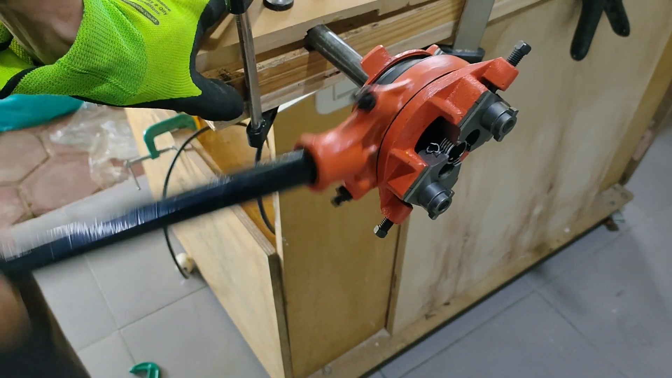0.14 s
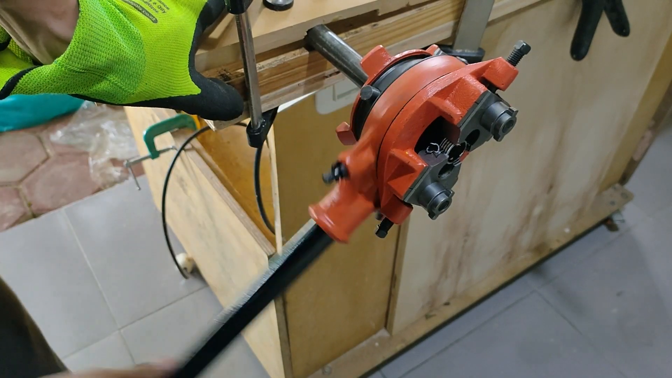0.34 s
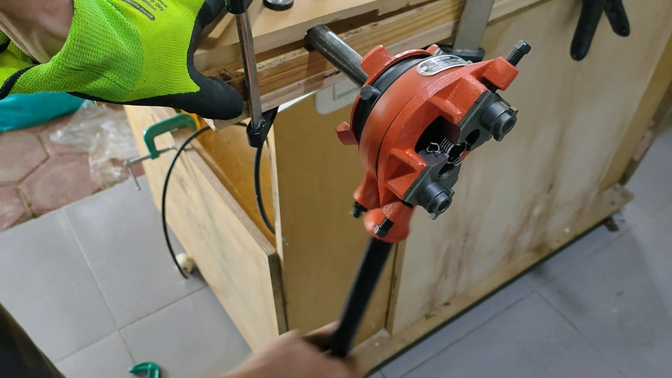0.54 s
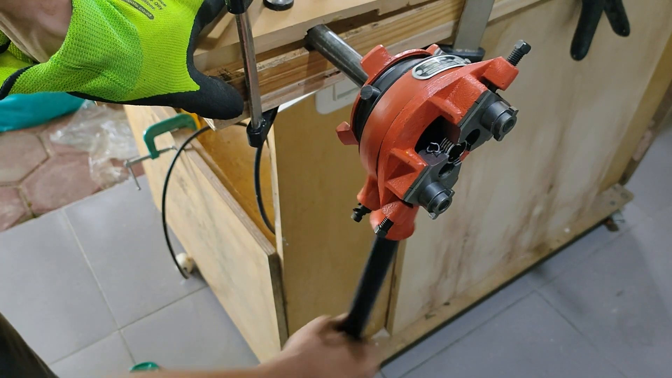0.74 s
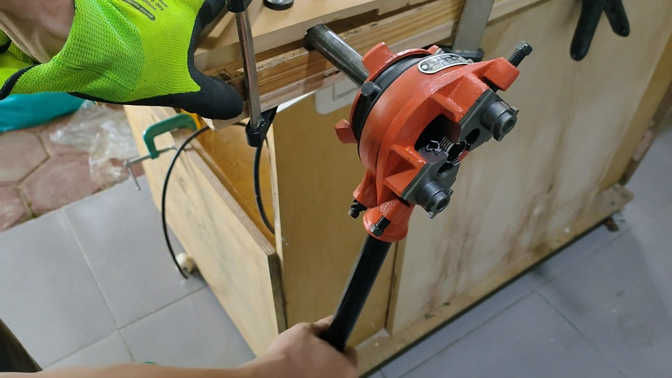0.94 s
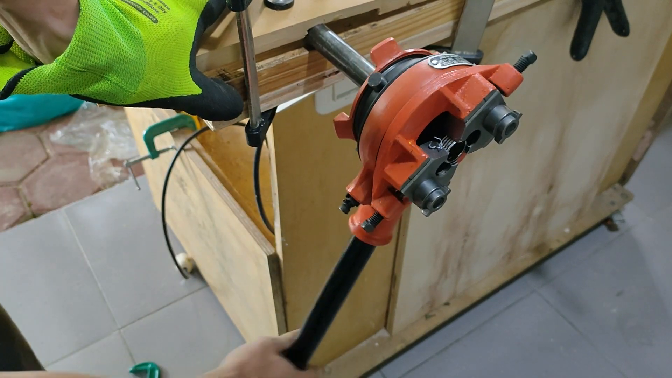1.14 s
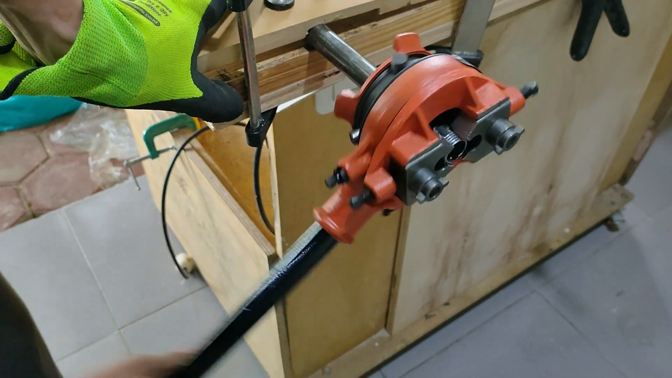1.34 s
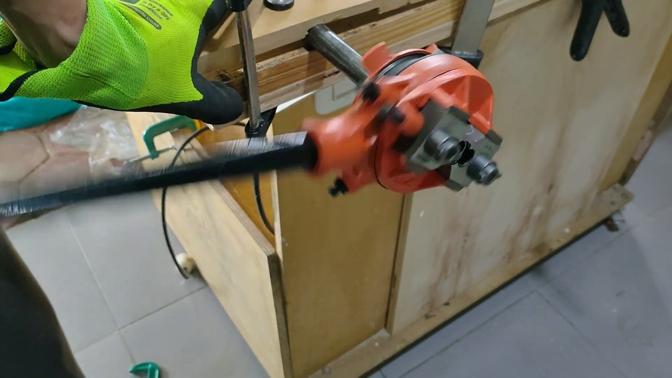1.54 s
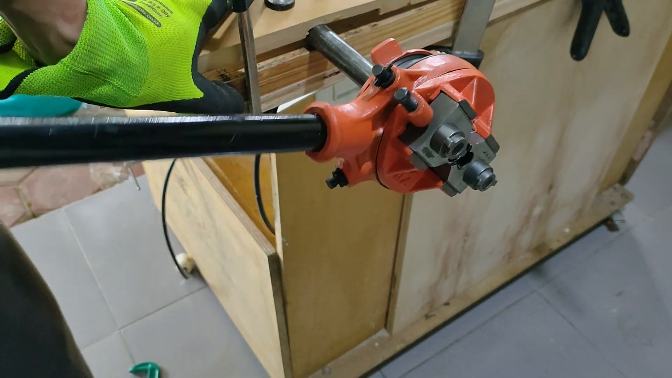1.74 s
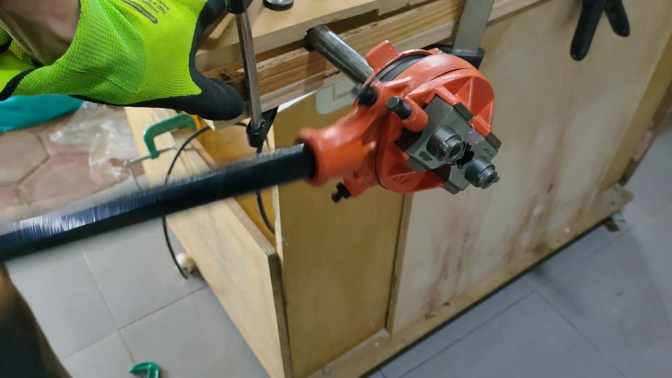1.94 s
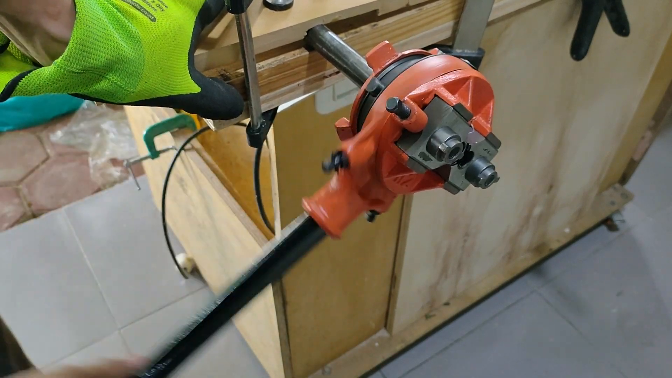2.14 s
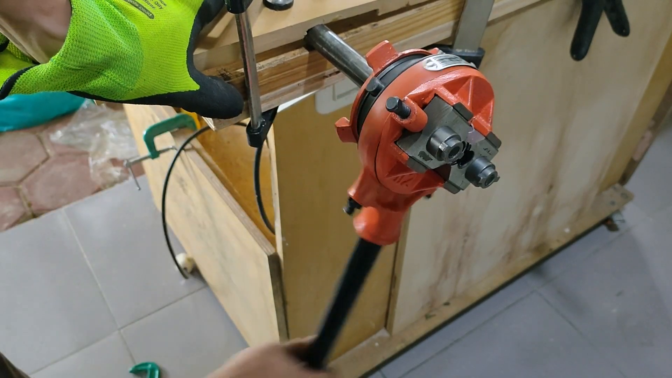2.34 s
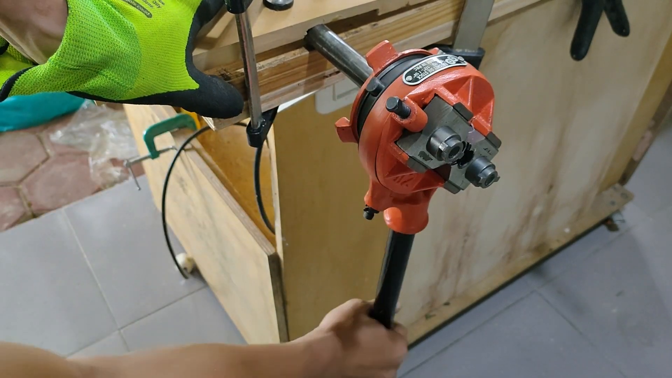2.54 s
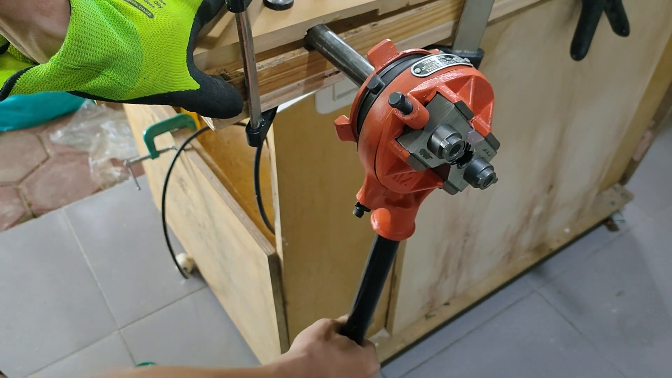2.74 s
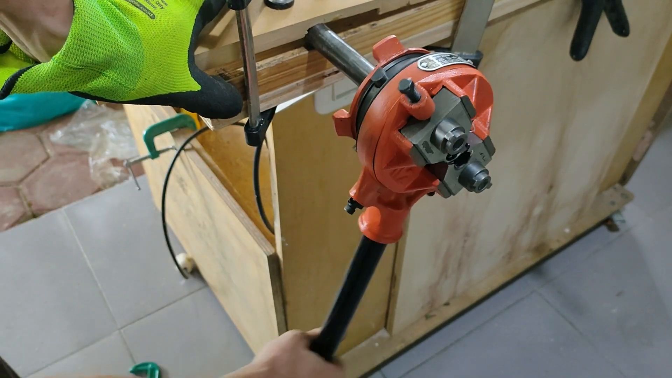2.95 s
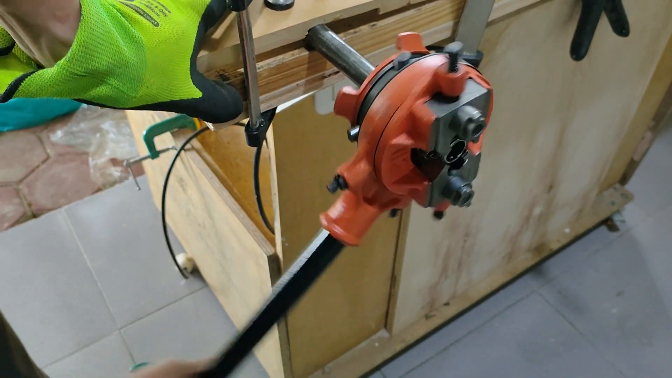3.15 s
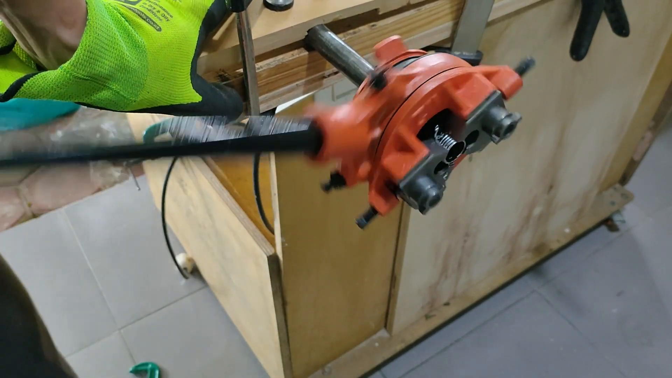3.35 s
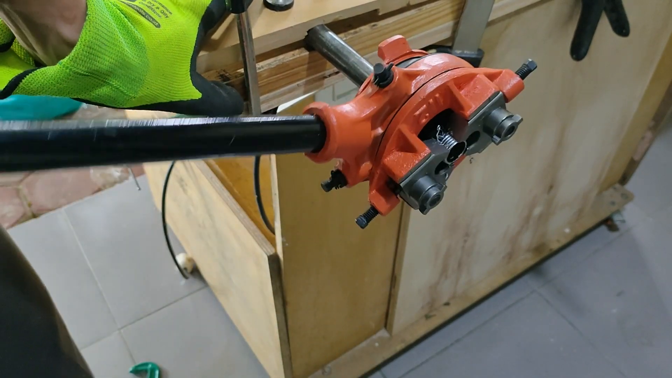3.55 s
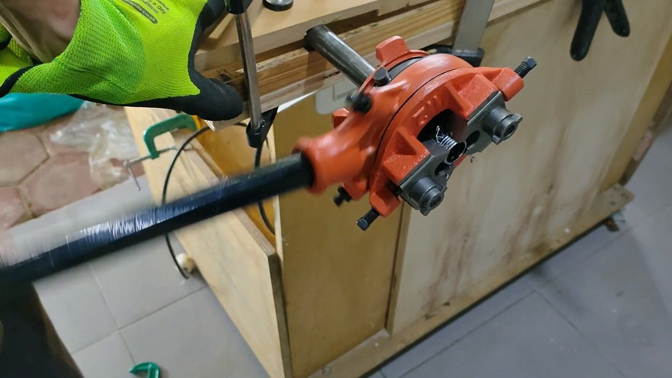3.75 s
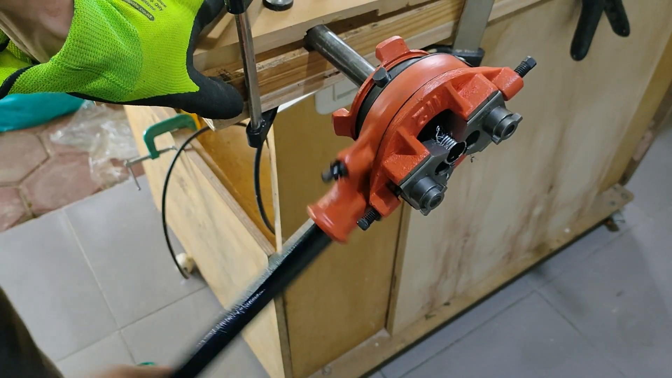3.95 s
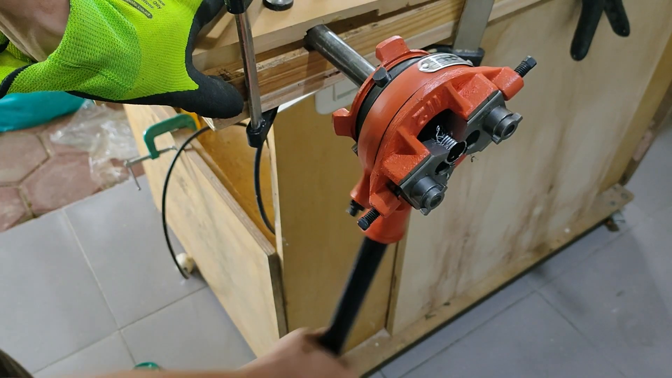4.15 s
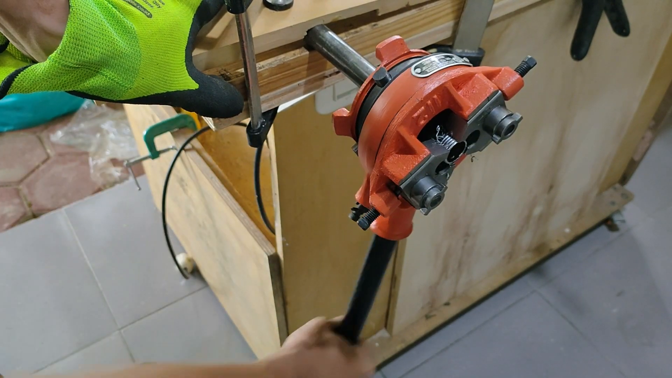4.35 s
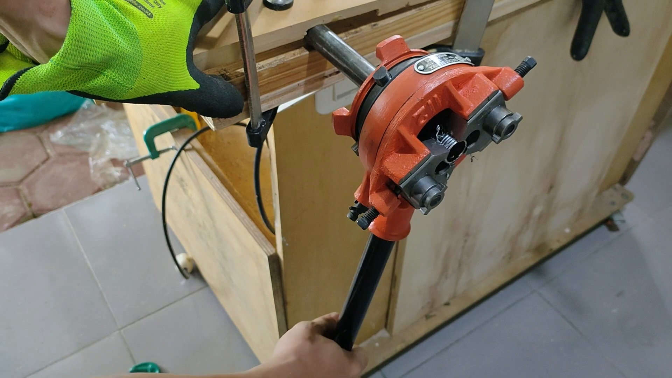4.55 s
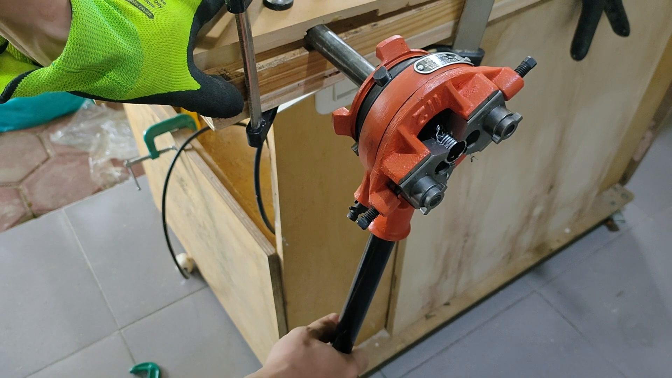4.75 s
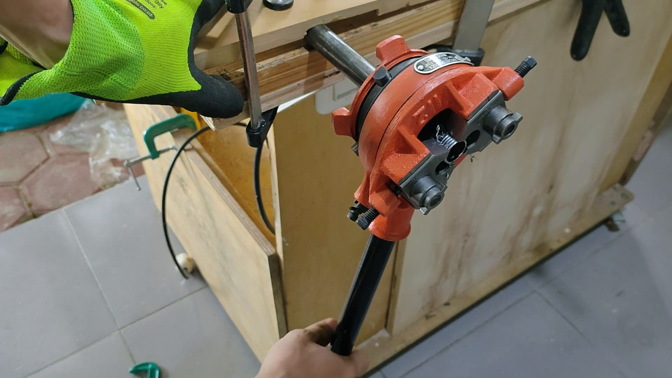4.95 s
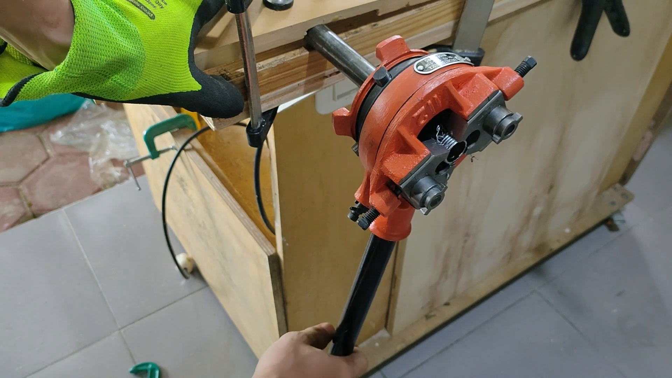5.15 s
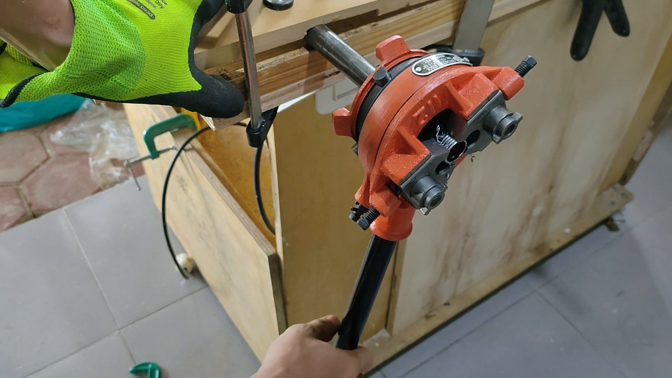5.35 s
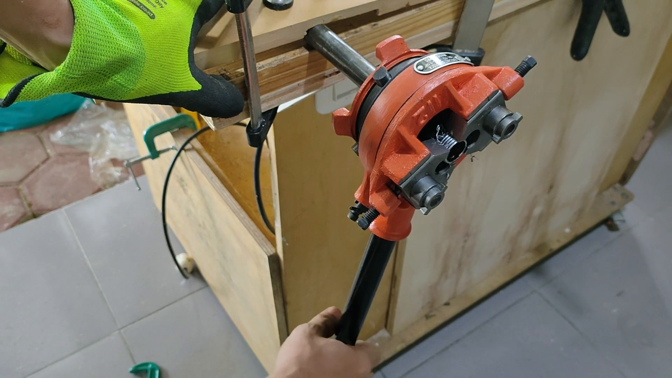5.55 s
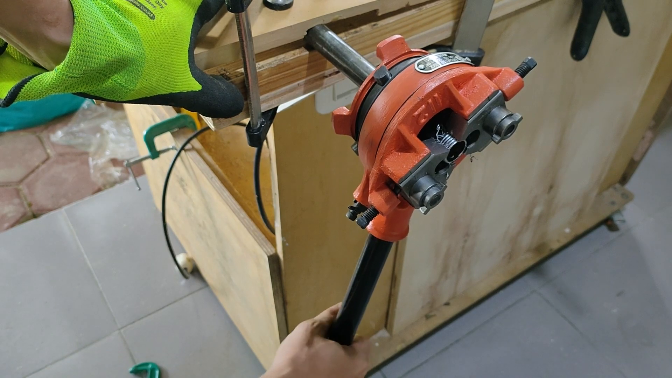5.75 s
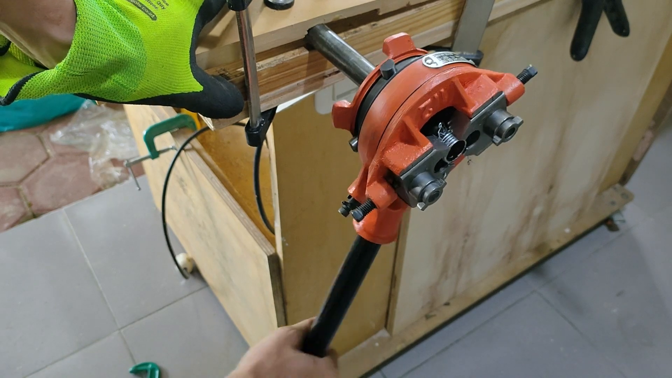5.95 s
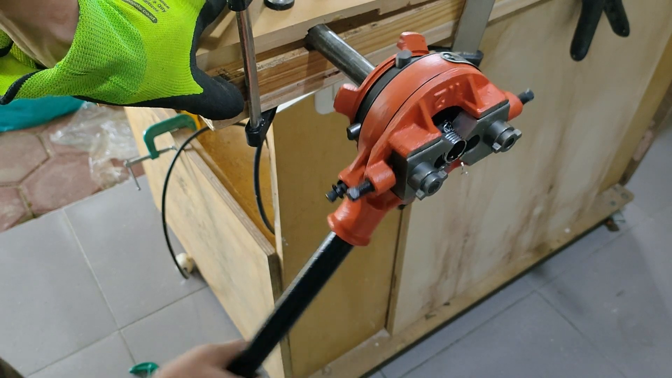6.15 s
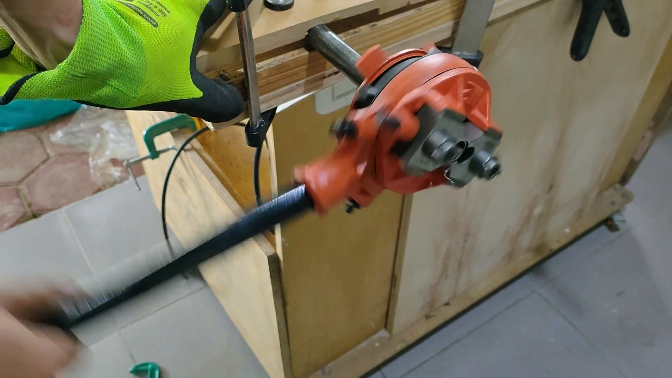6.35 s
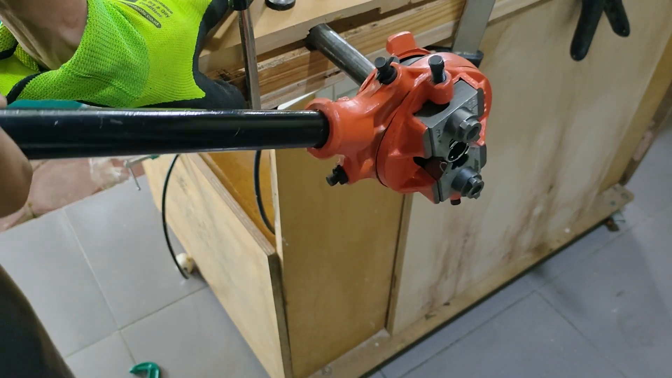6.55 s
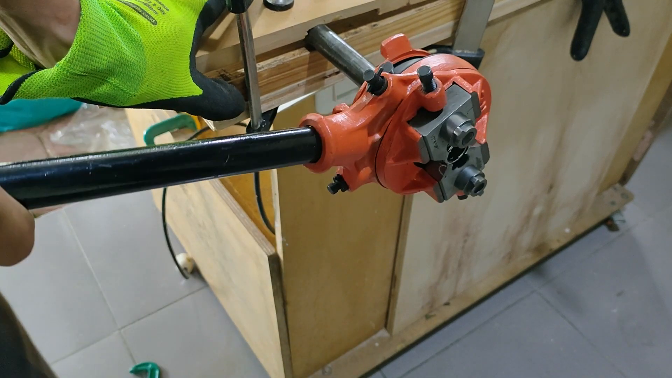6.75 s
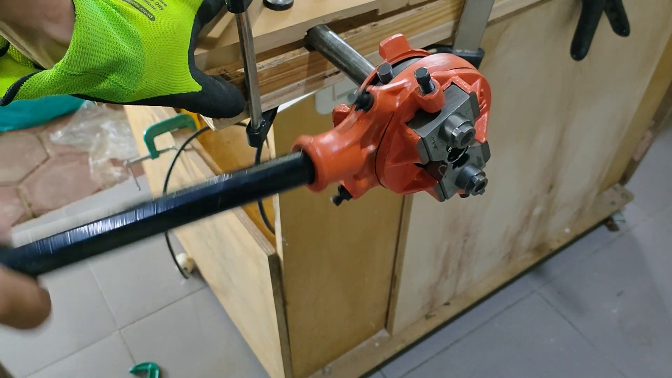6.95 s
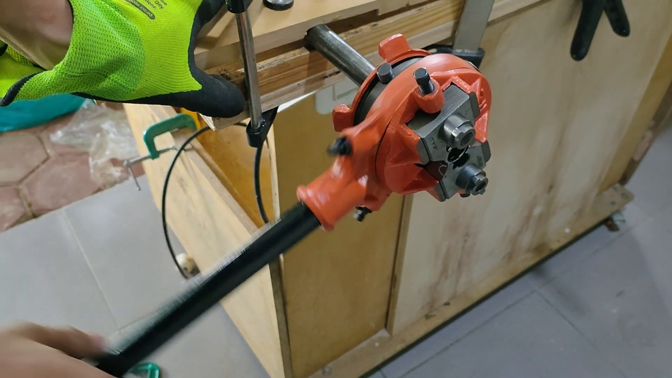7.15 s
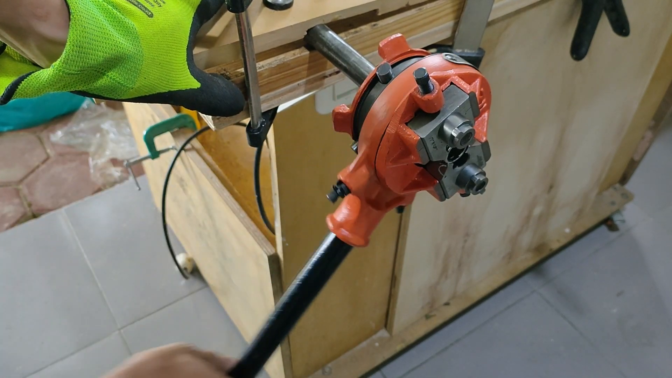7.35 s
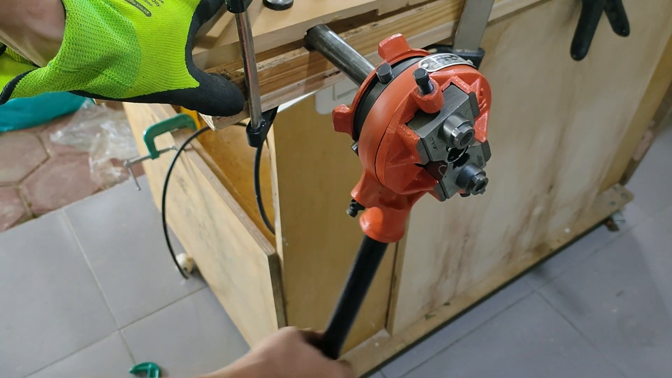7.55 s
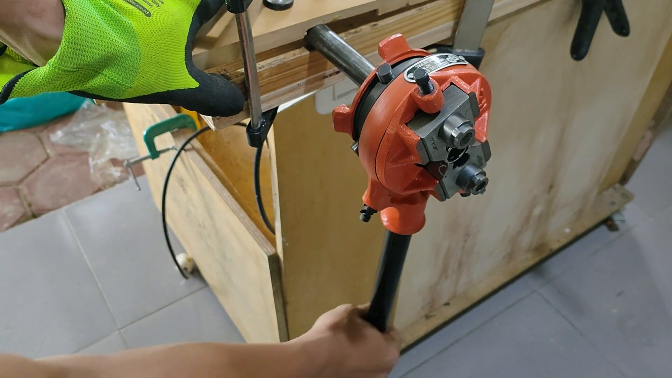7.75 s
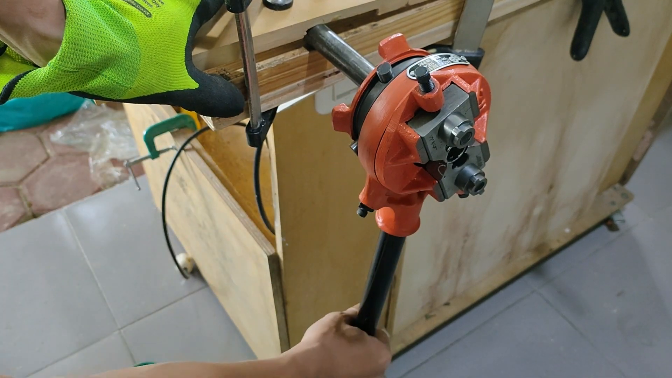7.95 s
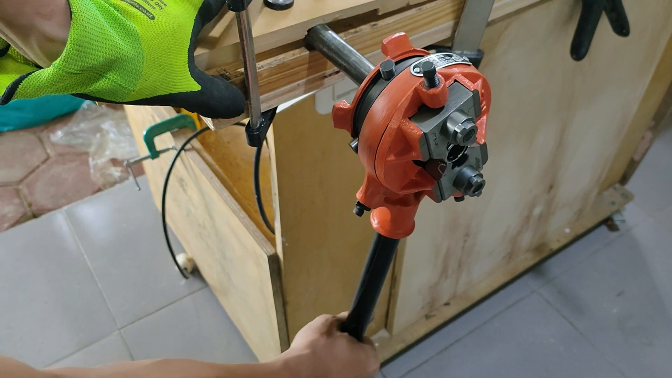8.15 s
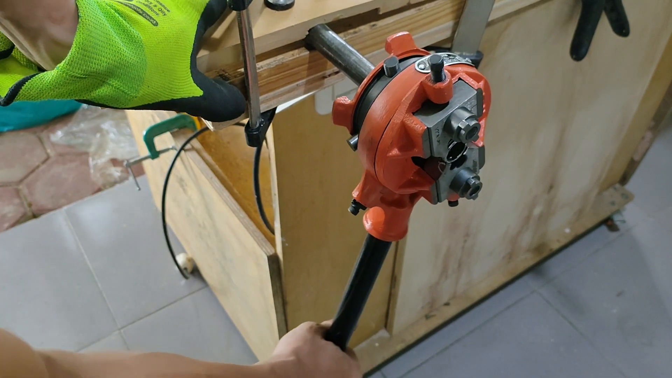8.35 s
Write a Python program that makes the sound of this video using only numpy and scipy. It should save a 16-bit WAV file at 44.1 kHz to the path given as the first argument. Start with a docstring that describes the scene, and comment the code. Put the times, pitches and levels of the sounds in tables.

```python
"""A ratchet die stock threads a steel pipe clamped to a wooden workbench in a tiled room. First a down-swing:
the handle rumbles round the head and taps, each tooth sets off the pawl's crack and ring. Then an up-swing:
noise builds with effort as the dies scrape the pipe; thin glides squeak and groan. The two alternate to the
end. Between and during them the slack head and the handle knock: steel clanks, decaying sines ring the pipe,
resonant noise booms in the bench. Quiet room noise runs throughout."""
import sys
import numpy as np
from scipy import signal
from scipy.fft import rfft, irfft, next_fast_len
from scipy.io import wavfile
from scipy.ndimage import map_coordinates

SR = 44100
rng = np.random.default_rng(int(sys.argv[2]) if len(sys.argv) > 2 else 0)


def transcribe(signal):
    """Save signal, clipped to [-1, 1], as a 16-bit WAV file at the path in sys.argv[1]."""
    frames = np.atleast_2d(signal).T
    limited = np.clip(frames, -1, 1)
    pcm = np.round(limited * 32767).astype(np.int16)
    wavfile.write(sys.argv[1], SR, pcm)


N = 374850

# Levels in the tables are relative: each layer adds its own trim.
# pawl drops off a tooth: start_s, level_db
PAWL_CLICKS = [(0.0594, -26), (0.103, -28), (0.1568, -28), (0.194, -24.5), (0.2425, -29), (0.2772, -26),
               (0.3224, -28), (0.3546, -26.5), (0.4003, -27.5), (0.4361, -23.5), (0.4915, -30.5),
               (0.5383, -24), (0.6736, -61), (1.823, -54), (1.8775, -49), (1.9437, -24), (1.983, -25.5),
               (2.043, -24), (2.0738, -25.5), (2.1243, -26), (2.1536, -26), (2.2015, -24.5), (2.2338, -26),
               (2.288, -24.5), (2.3265, -25.5), (2.4006, -23.5), (2.5687, -46), (2.92, -68.5),
               (3.6052, -60), (3.6405, -41.5), (3.6799, -24.5), (3.741, -30), (3.785, -22.5),
               (3.8399, -27.5), (3.8724, -27), (3.9165, -27.5), (3.95, -26), (3.993, -27), (4.0336, -24),
               (4.0947, -29), (4.1659, -26), (6.833, -62), (6.8602, -60), (6.9102, -50.5), (6.9761, -26.5),
               (7.0471, -26.5), (7.1089, -24), (7.159, -25.5), (7.22, -26), (7.271, -26.5), (7.3453, -27.5),
               (7.4136, -26.5), (7.4983, -26.5), (7.593, -26.5), (7.7514, -29.5)]
# knocks of the head and vice taking up slack, and of the handle during the swings: start_s, level_db,
# clank_re_knock_db
KNOCK_EVENTS = [(0.014, -29.5, -17), (0.123, -37, -17), (0.554, -30, -31), (0.71, -25, -10),
                (0.728, -21.5, -27), (1.47, -18.5, -12.5), (1.802, -35, -28.5), (1.914, -32, -22),
                (1.95, -23, -34), (2.565, -27.5, -35), (2.73, -42.5, -24.5), (3.143, -26.5, -25),
                (3.248, -28.5, -22.5), (3.284, -27.5, -29), (3.761, -25, -21), (4.168, -28, -35),
                (4.344, -28.5, -17.5), (5.042, -51, -23), (5.296, -53.5, -37), (5.477, -35, -30.5),
                (5.531, -38, -21.5), (6.081, -45, -21.5), (6.345, -11, -18.5), (6.707, -45, -20.5),
                (6.835, -41, -25), (6.998, -22, -26.5), (7.867, -36.5, -45.5)]
# sharp low taps of the handle during the down-swings: start_s, level_db
HANDLE_TAPS = [(0.1055, -18.5), (0.1963, -22.5), (6.9757, -14.5)]
# free down-swings: start_s, end_s, rumble_at_working_speed_db
FREE_SWINGS = [(0.109, 0.557, -39.5), (1.95, 2.43, -39), (3.68, 4.157, -41), (6.988, 7.803, -38.5)]
# working strokes, and a faint short stretch of rumble at 4.52 s after a knock; levels reached at their end:
# start_s, end_s, low_rumble_db, upper_rumble_db, scrape_db
WORKING_STROKES = [(1.124, 1.462, -49, -44.5, -60.5), (2.96, 3.12, -50, -49, -67.5),
                   (3.186, 3.283, -42.5, -42.5, -55.5), (4.52, 4.682, -62.5, -62.5, -81.5),
                   (5.72, 6.03, -63.5, -67, -76.5), (6.13, 6.361, -48, -42.5, -60),
                   (8.11, 8.511, -76, -59, -58.5)]
# thin squeaks, faint groans: start_s, length_s, start_hz, end_hz, level_db, waver_share
SQUEAK_GLIDES = [(1.029, 0.051, 6720, 5300, -59.5, 0.064), (1.064, .08, 5100, 4630, -76, 0.025),
                 (2.8, 0.21, 4640, 3990, -71.5, 0.024), (4.696, 0.24, 800, 721, -70.5, 0.074),
                 (5.732, 0.21, 4500, 4150, -85, .03), (5.86, 0.16, 1768, 1745, -74, 0.0044),
                 (8.09, 0.099, 546, 478, -61, 0.082), (8.2, 0.12, 538, 663, -64.5, .04),
                 (8.35, 0.16, 447.5, 493, -57.5, 0.016), (8.35, .18, 4600, 4660, -73, .01)]
# resonances of pipe, vice and bench: centre_hz, width_hz, level_db
BENCH_RESONANCES = [(105, 71, -8.5), (164, 26, -2.5), (242, 41, 3), (352, 51, 3.5), (424.4, 15, -3),
                    (483, 11, -0.5), (545, 83, -5), (637, 40, -2), (771, 28, -7), (886, 110, -9.5),
                    (1066, 12, -16), (1230, 20, -29.5)]
# resonances of the ratchet head: centre_hz, width_hz, level_db
HEAD_RESONANCES = [(1500, 90, -23.5), (4384, 92, -5.5), (5260, 50, -13.5), (5980, 43, -8.5), (5920, 35, -1),
                   (6450, 10, -8), (6853, 86, 2)]
# pipe and heavy head, rung by a knock: mode_hz, level_db, t60_s
PIPE_MODES = [(245, -0.5, 0.2), (356.9, -4, 0.24), (473.7, -3.5, 0.19), (781, -13.5, 0.22),
              (879, -20.5, .2), (1108, -17, 0.18), (1239, -19, 0.083)]
# bright part of a click: freq_hz, level_db
SNAP_COLOUR = [(4000, -21.5), (4800, -12.5), (5250, -3), (5800, -6.5), (6300, 0), (7000, -2), (7400, -3),
               (8500, -8.5)]
# duller body of a click: freq_hz, level_db
BODY_COLOUR = [(300, -24), (900, -2), (1350, -19), (1600, 3), (1900, -1.5), (3100, 3), (3800, -2.5),
               (4600, -2.5), (5500, -8.5), (8000, -25)]
# steel clank of a knock: freq_hz, level_db
CLANK_COLOUR = [(530, -35.5), (900, -1), (1050, -5), (1410, -25), (1600, -4), (3820, -21), (6910, -5),
                (8110, -17.5), (8500, -69), (11000, -100), (18700, -120)]
# cutting dies: freq_hz, level_db
SCRAPE_COLOUR = [(710, -26.5), (1200, -7.5), (1350, -8.5), (1950, -5), (3260, -10), (5030, -10.5),
                 (6590, -1.5), (7580, -6.5), (8500, -39), (11000, -67), (18700, -120)]
# quiet room: freq_hz, level_db
AIR_COLOUR = [(15, -42.5), (25, -19), (106, -9), (169, -2.5), (297, -18), (419, -10), (652, -8.5),
              (1060, -32.5), (1580, -23.5), (2910, -40.5), (5640, -40), (7390, -29.5), (8770, -52),
              (11400, -88.5), (19300, -120)]
# sideways lean of the snaps: freq_hz, left_minus_right_db
SNAP_LEAN = [(4500, 4), (5300, -1.5), (6400, 10.5), (7200, 7), (7700, -8.5)]
# likeness of left and right noise: freq_hz, correlation
STEREO_LIKENESS = [(50, 0.76), (125, .9), (250, 1), (500, 0.31), (1000, 0.1), (3000, 0.24), (7000, 0)]
# microphone treble: freq_hz, gain_db
MIC_ROLLOFF = [(7650, -1.5), (8000, -10.5), (8500, -33), (8926, -40), (10000, -48.5), (12000, -61)]
# overall bench tilt: freq_hz, gain_db
BENCH_TILT = [(25, -13.0), (60, -1.5), (100, 4.5), (650, -3.0), (1000, -6), (1400, -16.5),
              (2500, -12), (6000, -45.5)]
# dull part of the clank, rattle and rocking of the free head: freq_hz, level_db
DULL_COLOUR = [(600, -19.5), (1100, 0.0), (2000, -6.5), (3500, -8.5), (7000, -29.5)]
RATTLE_COLOUR = [(280, -32.5), (350, -0.5), (470, 0.5), (650, -6.5), (740, -30.5)]
ROCKING_COLOUR = [(35, -24.5), (60, -12.0), (85, -3.5), (115, 5.5), (160, -18.0), (400, -44.0)]

AGE_S = np.arange(SR) / SR  # time since a blow

ORDINARY_CLICK_DB = -26.5
CLICK_RISE_S, CLICK_RISE_SCATTER_DB = 0.0009, 5
CRACK_RE_CLICK_DB, CRACK_SCATTER_DB = 10.5, 2.5
SHARPENS_DB_PER_DB = 1.3  # extra crack and quicker attack per dB above an ordinary click
BODY_DB, BODY_GROWS_DB_PER_DB = -38.5, 0.7  # at an ordinary click, before the noise trim
LIMP_DB, LIMP_LIMIT = 3, 0.7  # extra body per log ratio of gap after to gap before; ratio limit
SNAP_LEFT_DB, SNAP_LEFT_SCATTER_DB = 6, 1.5
BOUNCE_S, BOUNCE_SCATTER_DB, BOUNCE_RE_CLICK_DB = 0.005, 3.5, 3
KNOCK_RISE_S, KNOCK_RISE_GROWS_DB_PER_DB = 0.014, 0.15  # hardest knock; softer ones rise sooner
BOOM_DB, BOOM_GROWS_DB_PER_DB = -31, 0.66  # at the hardest knock
RING_DB, RING_GROWS_DB_PER_DB = -14, 1.37  # at the hardest knock, before the mode levels
WORKING_TEETH_PER_S, SPEED_POWER = 20.3, 0.89
SWING_RISE_DB_PER_S, SWING_FALL_DB_PER_S = 158, 155
CUT_RISE_DB_PER_S, CUT_FALL_DB_PER_S = 255, 130.5
EFFORT_DB_PER_S = 32  # the arm leans ever harder on the dies
GRIP_DB = 1.5  # unevenness of steel dragging on steel
TAP_S = 0.001  # length of the push
BENCH_SPLIT_HZ, AIR_DB, MIC_TOP_HZ = 400, -69.5, 12000


def pawl():
    """The sprung pawl hits the next tooth: hard crack, bright chatter, short steel ring, one rebound."""
    start_s, level_db = np.transpose(PAWL_CLICKS)
    rise_chance, crack_chance, lean_chance, bounce_chance = rng.standard_normal((4, len(start_s)))
    sharp_db = SHARPENS_DB_PER_DB * np.maximum(level_db - ORDINARY_CLICK_DB, 0)
    rise_s = CLICK_RISE_S * amp(CLICK_RISE_SCATTER_DB * rise_chance - sharp_db)
    crack_db = level_db + CRACK_RE_CLICK_DB + sharp_db + CRACK_SCATTER_DB * crack_chance
    lean_db = SNAP_LEFT_SCATTER_DB * lean_chance

    # light touches are dull; a click that comes early has more body than a late one
    gaps_s = np.diff(start_s, prepend=start_s[0] - 1, append=start_s[-1] + 1)
    early = np.clip(np.diff(np.log(gaps_s)), -LIMP_LIMIT, LIMP_LIMIT)
    body_db = BODY_DB + BODY_GROWS_DB_PER_DB * (level_db - ORDINARY_CLICK_DB) + LIMP_DB * early

    snap_env = np.array([blows(start_s, level_db + side * lean_db / 2, rise_s,
                               t60_s=0.053, room_db=-13.5, room_t60_s=0.36) for side in (1, -1)])
    snap_noise = patchy(noise(colour(SNAP_COLOUR)), depth_db=4.0, width_hz=320, span_s=0.05, size=512)
    snap = amp(2.5) * snap_env * snap_noise
    snap += chatter(start_s, level_db - 4.5, low_hz=5126, high_hz=7200, t60_s=0.12, count=5)
    snap = filtered(snap, lambda hz: sides(along(SNAP_LEAN, hz) + SNAP_LEFT_DB))

    body_env = blows(start_s, body_db, rise_s, t60_s=0.047, room_db=-17.0, room_t60_s=0.35)
    body_noise = patchy(noise(colour(BODY_COLOUR)), depth_db=1.5, width_hz=350, span_s=0.042, size=512)
    body = amp(4.0) * body_env * body_noise
    body += chatter(start_s, body_db, low_hz=1513, high_hz=3650, t60_s=0.16, count=6)

    head_env = blows(start_s, level_db, rise_s, t60_s=0.18, room_db=-13.5, room_t60_s=0.4)
    head = amp(-8.5) * head_env * noise(resonances(HEAD_RESONANCES))

    crack = cracks(start_s, crack_db, pitch_hz=6300, t60_s=0.003) * sides(3)
    bounce_s = start_s + BOUNCE_S * amp(BOUNCE_SCATTER_DB * bounce_chance)
    bounce = cracks(bounce_s, level_db + BOUNCE_RE_CLICK_DB, pitch_hz=5900, t60_s=0.0035)
    return snap + body + head + crack + bounce * sides(SNAP_LEFT_DB)


def chatter(starts_s, levels_db, low_hz, high_hz, t60_s, count):
    """No two teeth ring alike: every blow picks its own few short modes out of a band."""
    track = np.zeros((2, N))
    age_s = AGE_S[:SR // 8]
    fall = dying(t60_s)[:len(age_s)]
    for start_s, level_db in zip(starts_s, levels_db):
        mode_hz = low_hz + (high_hz - low_hz) * rng.random((count, 1))
        modes = np.sin(2 * np.pi * mode_hz * age_s)
        mix = unit(rng.standard_normal((2, count))) / np.sqrt(count)
        add(track, start_s, amp(level_db) * fall * (mix @ modes))
    return track


def cracks(starts_s, levels_db, pitch_hz, t60_s):
    """First touch of steel on steel: a sine at a slightly random pitch that dies within milliseconds."""
    track = np.zeros(N)
    age_s = AGE_S[:SR // 100]
    envelope = (dying(t60_s) * (1 - dying(0.001)))[:len(age_s)]
    pitches_hz = pitch_hz * (1 + 0.039 * rng.standard_normal(len(starts_s)))
    for start_s, level_db, hz in zip(starts_s, levels_db, pitches_hz):
        add(track, start_s + 0.00048, amp(level_db) * np.sin(2 * np.pi * hz * age_s) * envelope)
    return track


def knocks():
    """The heavy head falls through its slack, or the handle knocks: steel clanks first, then pipe rings and
    bench booms."""
    start_s, level_db, steel_db = np.transpose(KNOCK_EVENTS)
    # harder knocks ring more and clank brighter; soft ones are mostly boom
    hardness_db = level_db - level_db.max()
    rise_s = KNOCK_RISE_S * amp(KNOCK_RISE_GROWS_DB_PER_DB * hardness_db)
    low, upper = bench_noise()

    clank_env = blows(start_s, level_db + steel_db + 0.2 * hardness_db,
                      rise_s * amp(-12.5 - 0.5 * hardness_db),
                      t60_s=0.09, room_db=-9.5, room_t60_s=0.39)
    clank = amp(-2.5) * clank_env * noise(colour(CLANK_COLOUR))
    dull_env = blows(start_s, level_db + steel_db, rise_s / 2, t60_s=0.12, room_db=-15, room_t60_s=0.45)
    dull = amp(-7) * dull_env * noise(colour(DULL_COLOUR))

    ring = pipe_ring(start_s, RING_DB + RING_GROWS_DB_PER_DB * hardness_db, rise_s, scatter_db=3.0)
    boom = low * blows(start_s, BOOM_DB + BOOM_GROWS_DB_PER_DB * hardness_db, rise_s * 2,
                       t60_s=0.18, room_db=-9.5, room_t60_s=0.75)
    thud_env = blows(start_s, level_db, rise_s, t60_s=0.2, room_db=-18.5, room_t60_s=0.78)
    thud = amp(-12.0) * thud_env * upper
    return clank + dull + ring + boom + thud


def pipe_ring(starts_s, levels_db, rises_s, scatter_db):
    """Each knock sets the pipe's modes swinging at new strengths; each dies exponentially."""
    track = np.zeros((2, N))
    age_s = AGE_S[:SR // 2]
    hz, mode_db, t60_s = np.transpose(PIPE_MODES)[..., None]
    for start_s, level_db, rise_s in zip(starts_s, levels_db, rises_s):
        # higher modes reach the two microphones further out of step
        phase_turns = rng.random(hz.shape) + hz / 8000 * rng.standard_normal((2, len(hz), 1))
        gain = amp(level_db + mode_db + scatter_db * rng.standard_normal(hz.shape))
        fall = gain * np.exp(-np.log(1000) * age_s / t60_s)
        modes = fall * np.sin(2 * np.pi * (hz * age_s + phase_turns))
        add(track, start_s, modes.sum(axis=1) * (1 - np.exp(-(age_s / rise_s) ** 2)))
    return track


def bench_noise():
    """Noise in the resonances of pipe, vice and bench, as its low and its upper part."""
    wood, tilt = resonances(BENCH_RESONANCES), colour(BENCH_TILT)
    low_gain = lambda hz: 1 / np.sqrt(1 + (hz / BENCH_SPLIT_HZ) ** 12)
    low = noise(lambda hz: wood(hz) * tilt(hz) * low_gain(hz))
    upper = noise(lambda hz: wood(hz) * tilt(hz) * np.sqrt(1 - low_gain(hz) ** 2))
    return low, upper


def rubbing():
    """Steel drags unevenly on steel: the pipe shakes the bench, and the cutting dies hiss."""
    swing = swinging()
    cut_low, cut_upper, scrape = cutting()
    low, upper = bench_noise()
    grip = amp(GRIP_DB * wobble(45))
    rumble = (amp(-5.5) * swing + amp(-1) * cut_low) * low
    rumble = rumble + (amp(-3.5) * swing + amp(-3.0) * cut_upper) * upper

    # the free head wobbles on the pipe: it rattles in the middle range and rocks the bench
    rattle_noise = patchy(noise(colour(RATTLE_COLOUR)), depth_db=6.0, width_hz=45, span_s=0.05, size=2048)
    rattle = amp(1.0) * swing * rattle_noise
    rocking = amp(-15.5) * swing * noise(colour(ROCKING_COLOUR))

    hiss_noise = patchy(noise(colour(SCRAPE_COLOUR)), depth_db=2, width_hz=150, span_s=0.12, size=1024)
    hiss = amp(-1.0) * scrape * hiss_noise
    return grip * ((rumble + rattle + rocking) * sides(-1.8) + hiss)


def swinging():
    """Gain of the free swings' rumble: the faster the teeth go by, the louder."""
    t_s, clicks_s = np.arange(N) / SR, np.transpose(PAWL_CLICKS)[0]
    total = 0
    for start_s, end_s, level_db in FREE_SWINGS:
        teeth_s = clicks_s[(clicks_s > start_s) & (clicks_s < end_s)]
        speed = np.interp(t_s, teeth_s, 1 / np.gradient(teeth_s)) / WORKING_TEETH_PER_S
        shape_db = stroke_db(start_s, end_s, SWING_RISE_DB_PER_S, SWING_FALL_DB_PER_S)
        total = total + speed ** SPEED_POWER * amp(level_db + shape_db)
    return total


def cutting():
    """Gains of low rumble, upper rumble and scrape: all build with effort through each working stroke."""
    t_s = np.arange(N) / SR
    total = 0
    for start_s, end_s, *levels_db in WORKING_STROKES:
        shape_db = stroke_db(start_s, end_s, CUT_RISE_DB_PER_S, CUT_FALL_DB_PER_S)
        effort_db = shape_db - EFFORT_DB_PER_S * np.maximum(end_s - t_s, 0)
        total = total + amp(np.add.outer(levels_db, effort_db))
    return total


def stroke_db(start_s, end_s, rise_db_per_s, fall_db_per_s):
    """Level of a stroke: rises to 0 dB at its start, holds, falls after its end."""
    t_s = np.arange(N) / SR
    return -rise_db_per_s * np.maximum(start_s - t_s, 0) - fall_db_per_s * np.maximum(t_s - end_s, 0)


def handle_taps():
    """Sharp low tap with no ring: one short push of air and the weaker pull after it."""
    track = np.zeros(N)
    u = AGE_S[:SR // 50] / TAP_S
    for start_s, level_db in HANDLE_TAPS:
        add(track, start_s, amp(level_db) * (1 - u) * np.exp(-u))
    return track


def squeaks(room_db=0, room_t60_s=0.29):
    """Faint sine glides with a randomly wavering pitch, blurred by a decaying noise tail as the room."""
    track = np.zeros(N)
    unsteady = wobble(620)
    for start_s, length_s, start_hz, end_hz, level_db, waver in SQUEAK_GLIDES:
        glide_hz = np.geomspace(start_hz, end_hz, int(length_s * SR))
        hz = glide_hz * (1 + waver * unsteady[:len(glide_hz)])
        tone = np.sin(2 * np.pi * np.cumsum(hz) / SR)
        add(track, start_s, amp(level_db) * np.sqrt(np.hanning(len(hz))) * tone)
    tail = rng.standard_normal((2, SR)) * dying(room_t60_s)
    room = signal.fftconvolve(track[None], tail / np.linalg.norm(tail[0]), axes=1)[:, :N]
    return amp(-1) * (track + amp(room_db) * room)


def room_air():
    """Quiet room: steady coloured noise whose colour drifts."""
    air = noise(colour(AIR_COLOUR))
    return amp(AIR_DB) * patchy(air, depth_db=3.0, width_hz=170, span_s=0.087, size=1024)


def blows(starts_s, levels_db, rises_s, t60_s, room_db, room_t60_s):
    """Envelope of a series of blows: each swells, dies fast and leaves a room tail; their powers add."""
    power = np.zeros(N)
    fall = dying(t60_s) ** 2 + (amp(room_db) * dying(room_t60_s)) ** 2
    for start_s, level_db, rise_s in zip(starts_s, levels_db, rises_s):
        shape = fall * -np.expm1(-(AGE_S / max(rise_s, 1e-4)) ** 2)
        add(power, start_s, amp(level_db) ** 2 * shape / shape.max())
    return np.sqrt(power)


def noise(response):
    """Stereo noise, its mid at rms 1: left and right are most alike near 250 Hz, unrelated by 7 kHz."""
    turn = lambda hz: np.arccos(np.clip(along(STEREO_LIKENESS, hz), -1, 1)) / 2
    mid_side = lambda hz: response(hz) * np.array([np.cos(turn(hz)), np.sin(turn(hz))])
    mid, side = filtered(rng.standard_normal((2, N)), mid_side)
    return np.array([mid + side, mid - side]) / np.std(mid)


def patchy(x, depth_db, width_hz, span_s, size):
    """The colour drifts: random gains over patches of frequency and time; rms 1."""
    z = signal.stft(x, nperseg=size)[2]
    patches_per_bin = np.array([SR / size / width_hz, size / 2 / SR / span_s])
    knots = np.indices(z.shape[1:]) * patches_per_bin[:, None, None]
    field = map_coordinates(rng.standard_normal((512, 512)), knots, order=1, mode="wrap")
    return unit(signal.istft(z * amp(depth_db * unit(field)), nperseg=size)[1][:, :N])


def resonances(modes):
    """Gain of (centre_hz, width_hz, level_db) resonances over frequency; their powers add."""
    def gain(hz):
        power = 0
        for centre, width, level_db in modes:
            peak = hz * width / (centre * centre - hz * hz + 1j * hz * width)
            power = power + abs(amp(level_db) * peak) ** 2
        return np.sqrt(power)
    return gain


def colour(points):
    """Gain of (freq_hz, level_db) points over frequency."""
    return lambda hz: amp(along(points, hz))


def along(points, hz):
    """(freq_hz, value) points interpolated on a log frequency axis."""
    point_hz, value = np.transpose(points)
    return np.interp(np.log(hz + 1), np.log(point_hz + 1), value)


def filtered(x, response):
    """x times a response of frequency."""
    m = next_fast_len(x.shape[-1] + 8192)
    return irfft(rfft(x, m) * response(np.fft.rfftfreq(m, 1 / SR)), m)[..., :x.shape[-1]]


def wobble(knots_per_s):
    """Smooth random curve through random knots."""
    knots = rng.standard_normal(int(N * knots_per_s / SR) + 4)
    return map_coordinates(knots, [np.arange(N) * knots_per_s / SR])


def dying(t60_s):
    """Exponential fall of 60 dB in t60_s."""
    return np.exp(-np.log(1000) * AGE_S / t60_s)


def sides(left_minus_right_db):
    """Left and right gains for a level difference."""
    db = np.atleast_1d(left_minus_right_db)
    return amp(np.array([db, -db]) / 2)


def add(track, start_s, sound):
    """Mixes a sound into a track, cut at the track's end."""
    part = track[..., max(round(start_s * SR), 0):][..., :sound.shape[-1]]
    part += sound[..., :part.shape[-1]]


def amp(db):
    """Decibels to gain."""
    return 10 ** (np.asarray(db) / 20)


def unit(x):
    """Scaled to rms 1."""
    return x / np.sqrt(np.mean(x ** 2) + 1e-20)


def scene():
    """The tool at work over the quiet air of the room."""
    return pawl() + knocks() + rubbing() + handle_taps() + squeaks() + room_air()


def record(dry):
    """The microphone's treble falls away steeply above 8 kHz and ends at MIC_TOP_HZ."""
    return filtered(dry, lambda hz: amp(along(MIC_ROLLOFF, hz)) * (hz < MIC_TOP_HZ))


dry = scene()
out = record(dry)
transcribe(out)
```